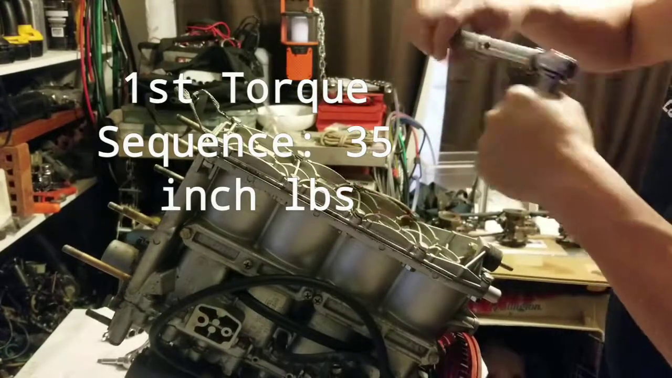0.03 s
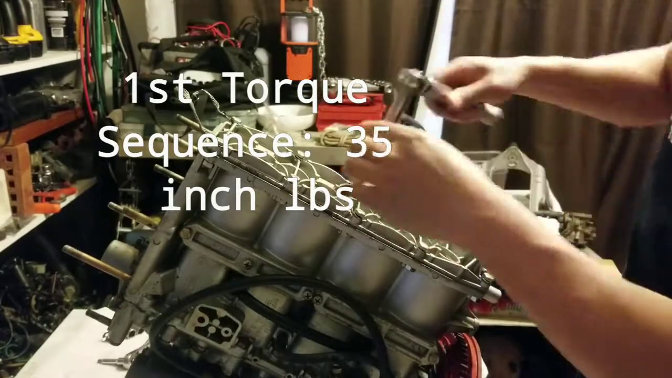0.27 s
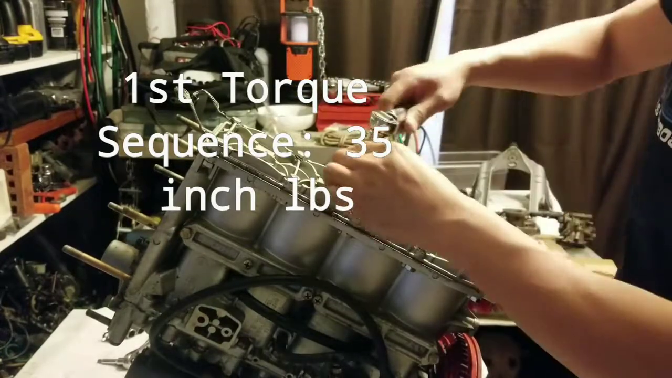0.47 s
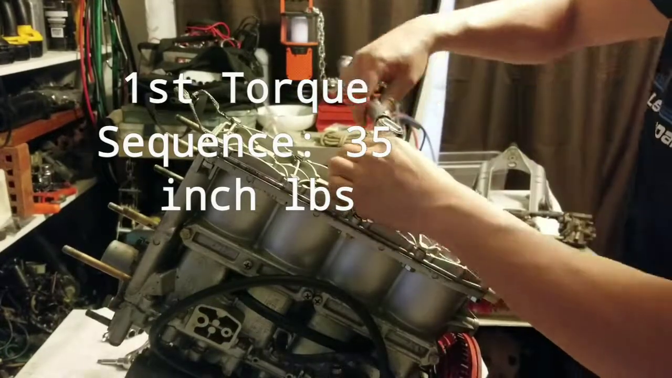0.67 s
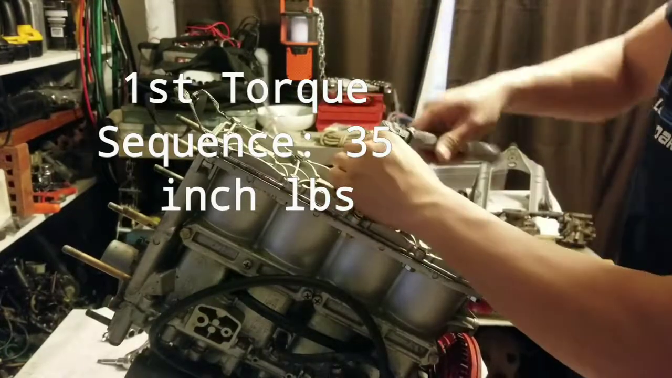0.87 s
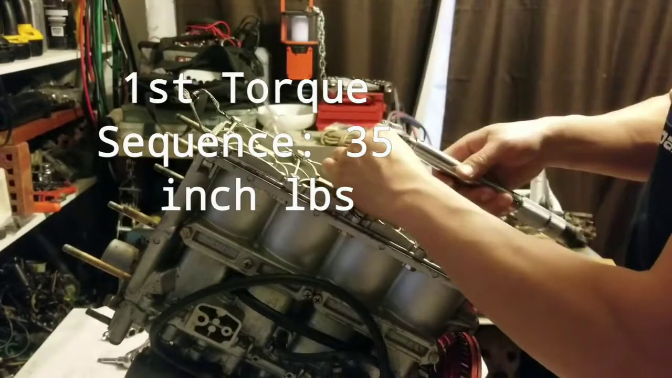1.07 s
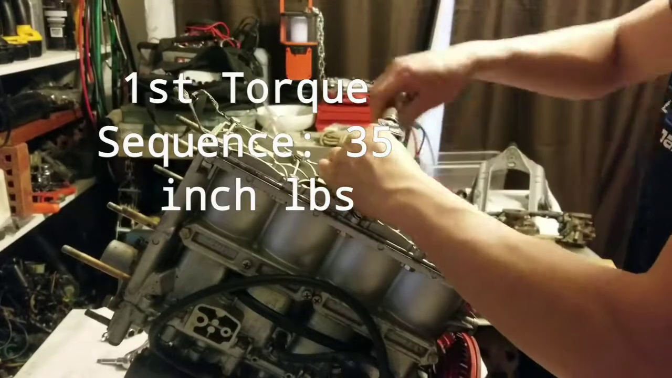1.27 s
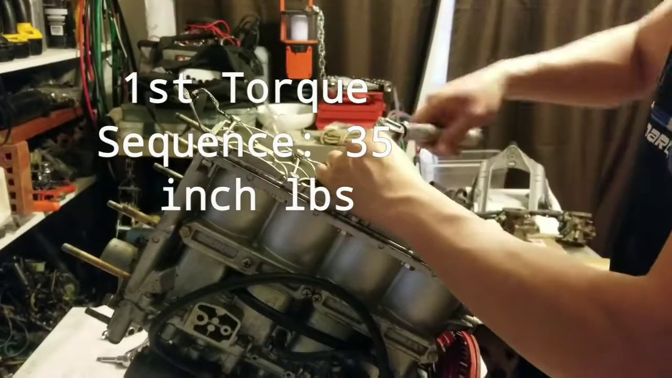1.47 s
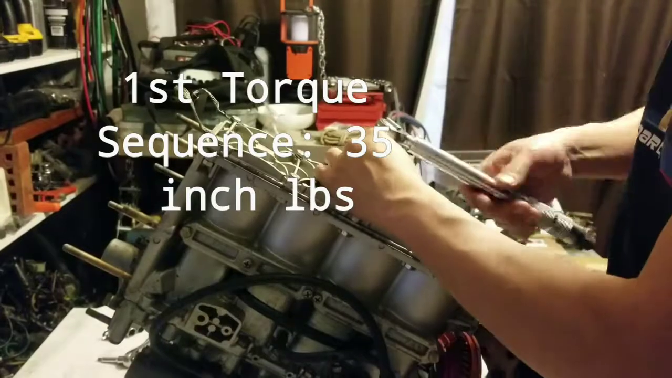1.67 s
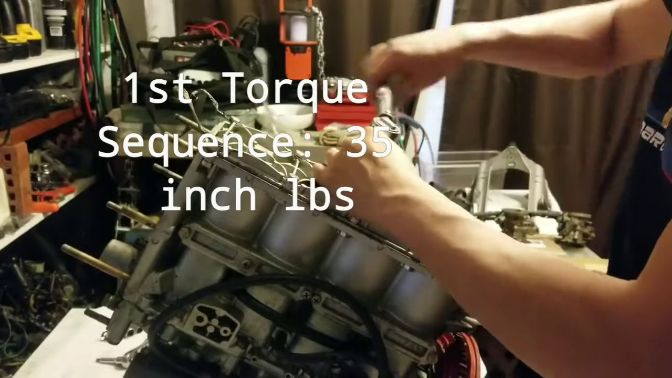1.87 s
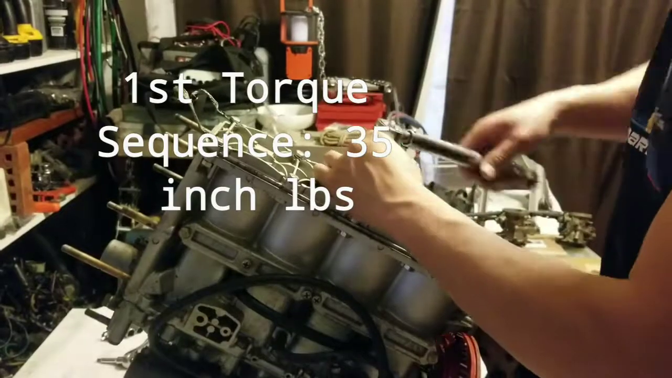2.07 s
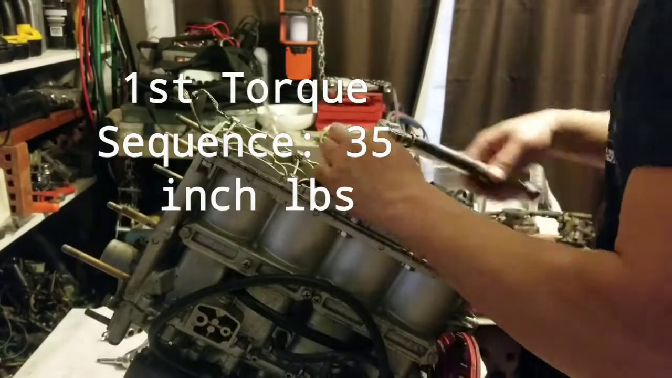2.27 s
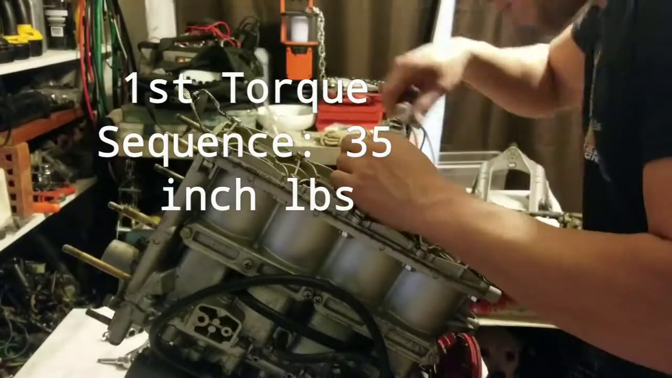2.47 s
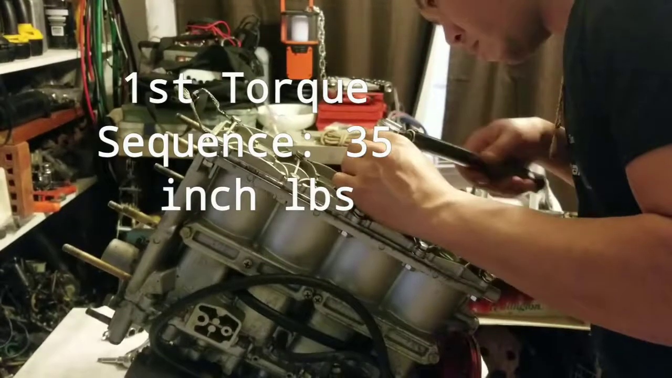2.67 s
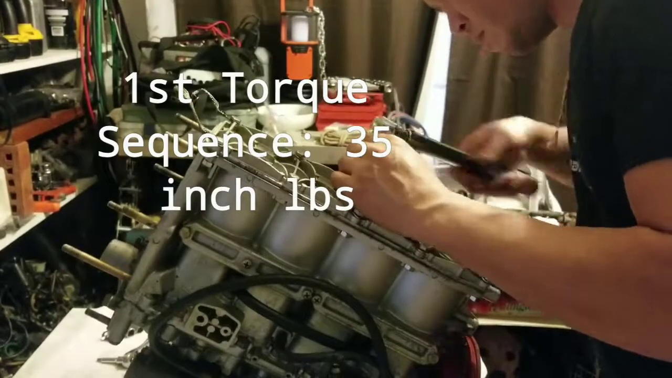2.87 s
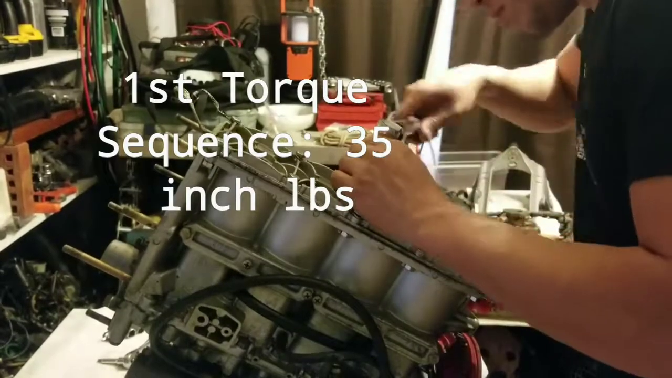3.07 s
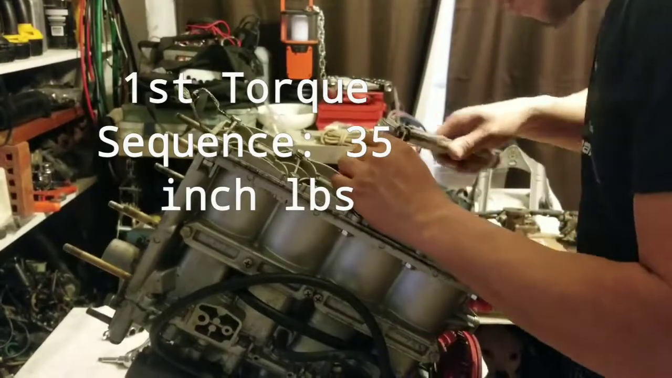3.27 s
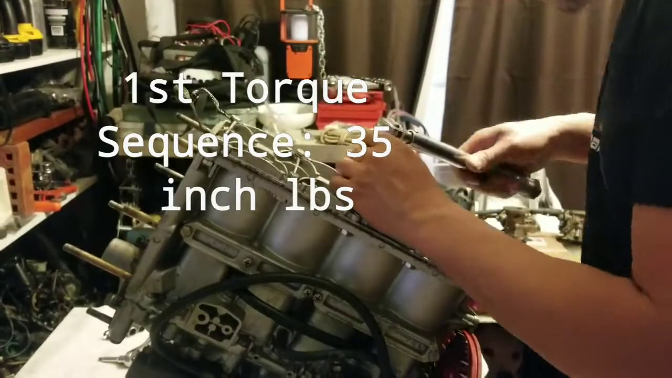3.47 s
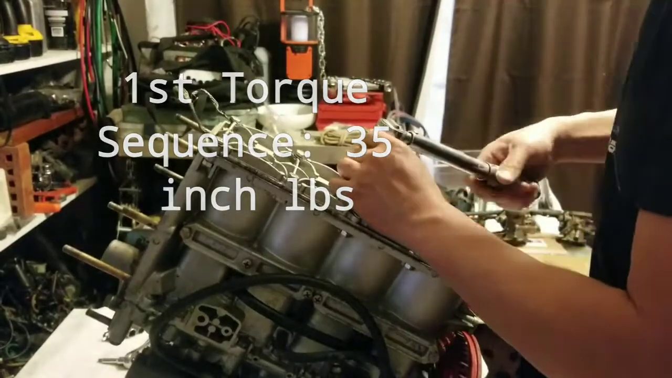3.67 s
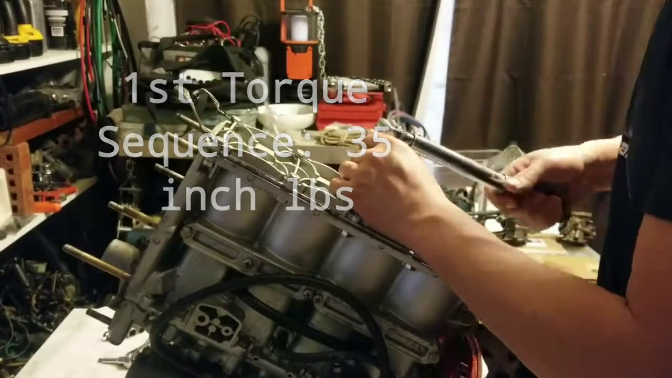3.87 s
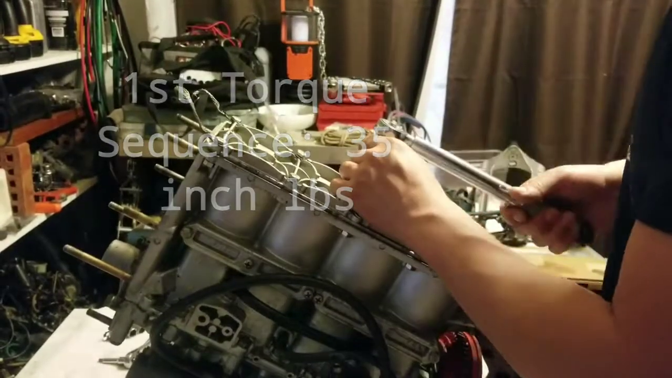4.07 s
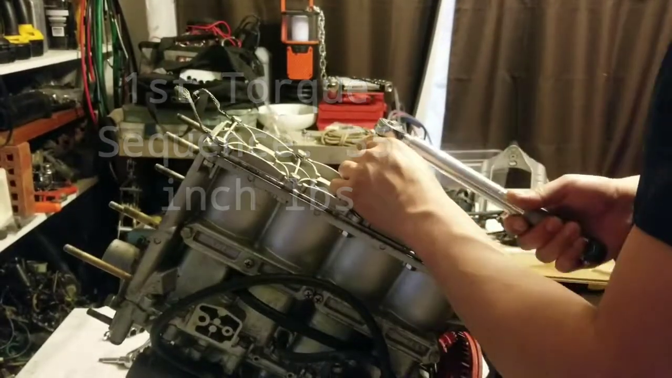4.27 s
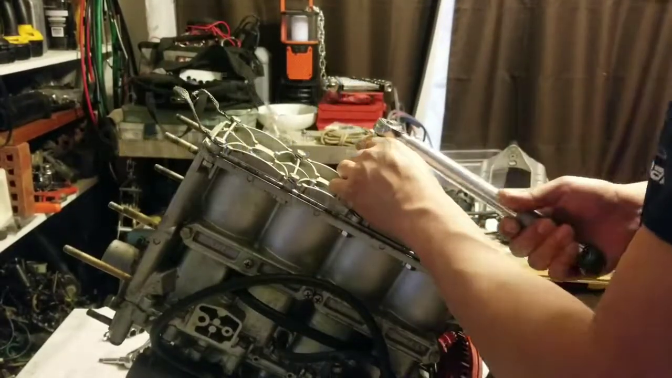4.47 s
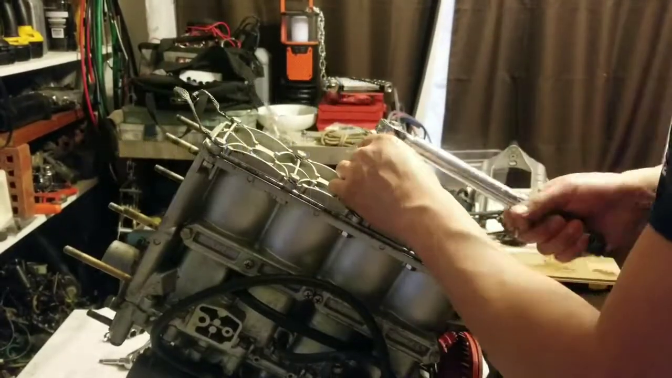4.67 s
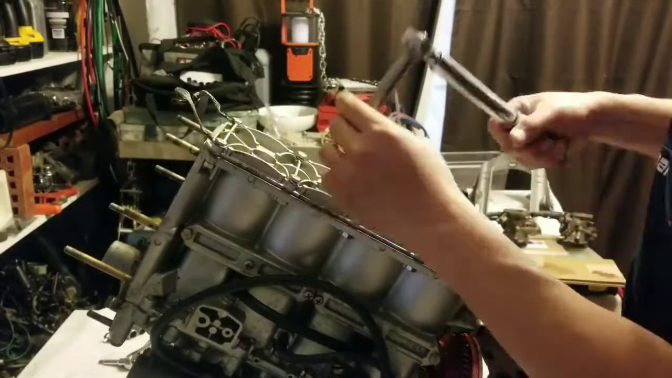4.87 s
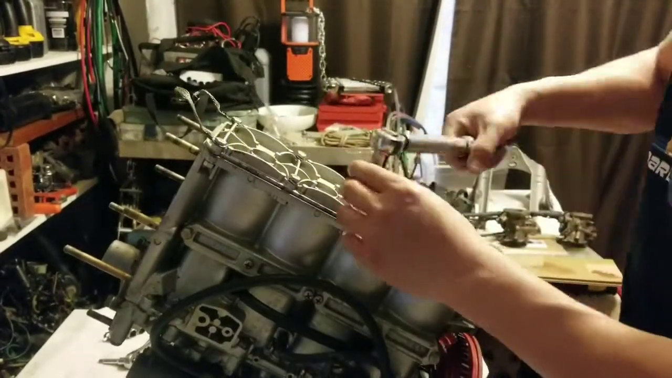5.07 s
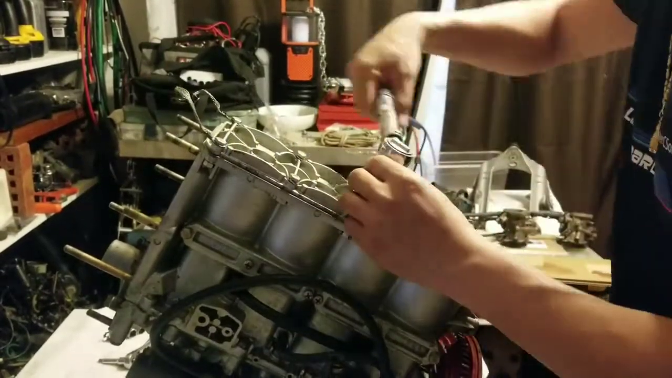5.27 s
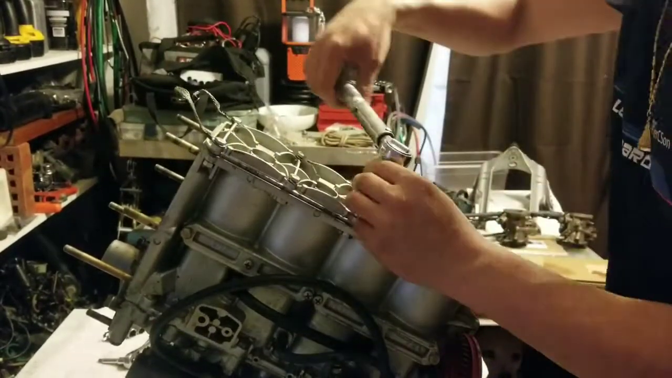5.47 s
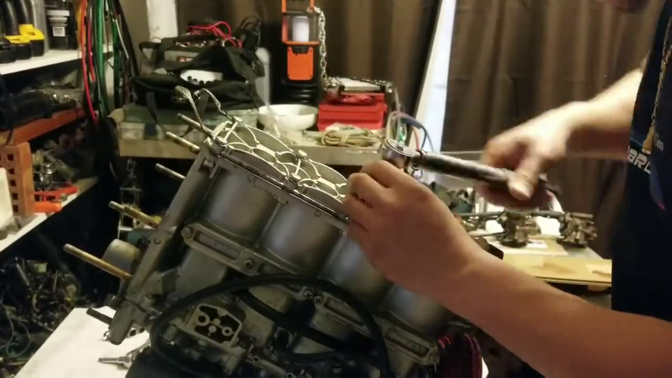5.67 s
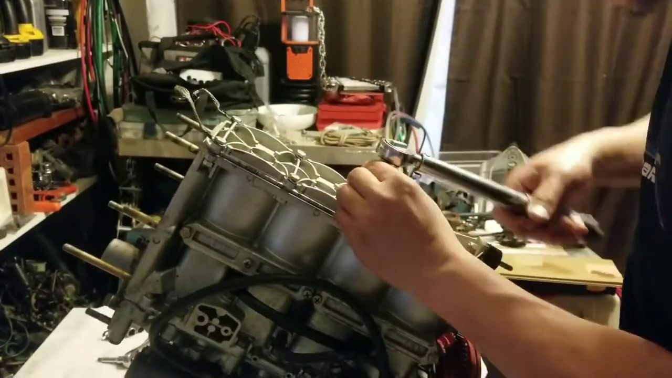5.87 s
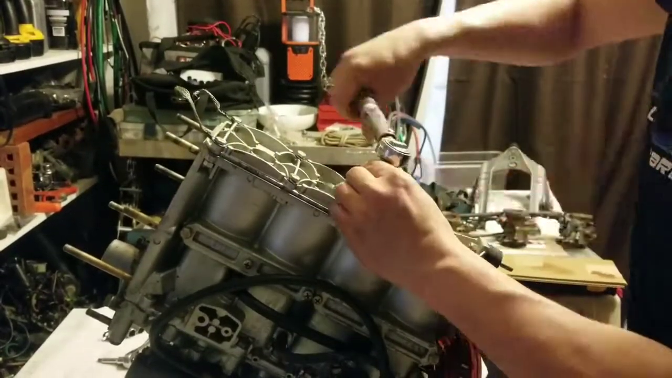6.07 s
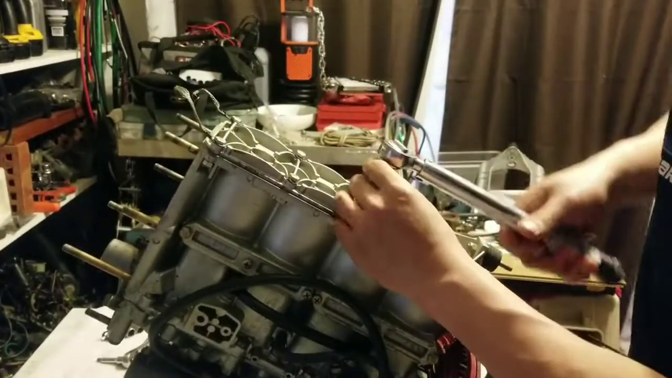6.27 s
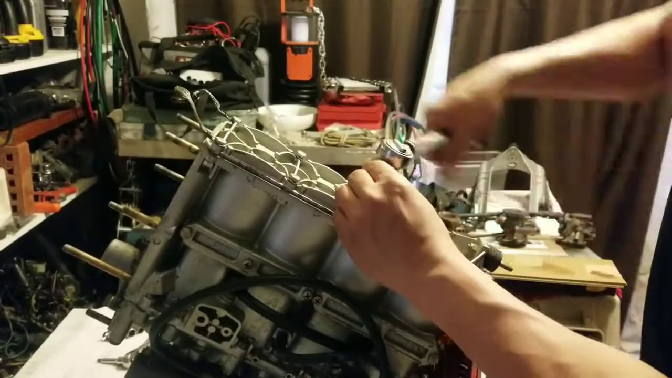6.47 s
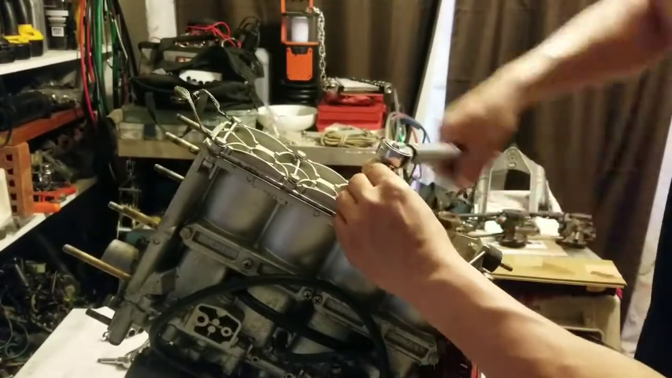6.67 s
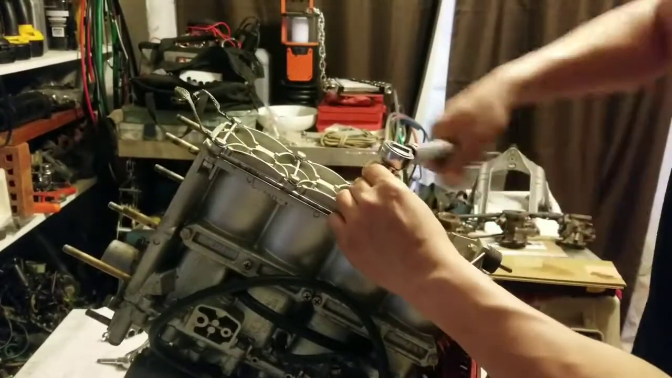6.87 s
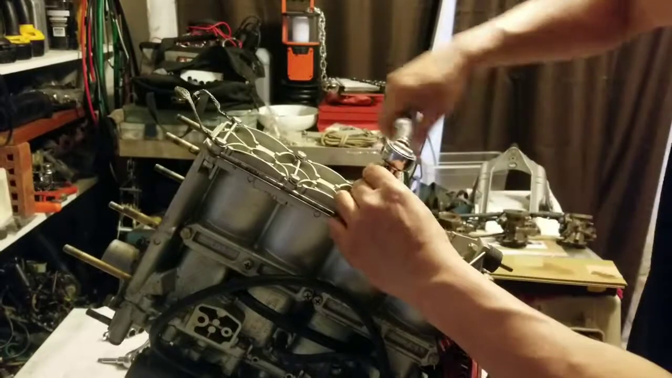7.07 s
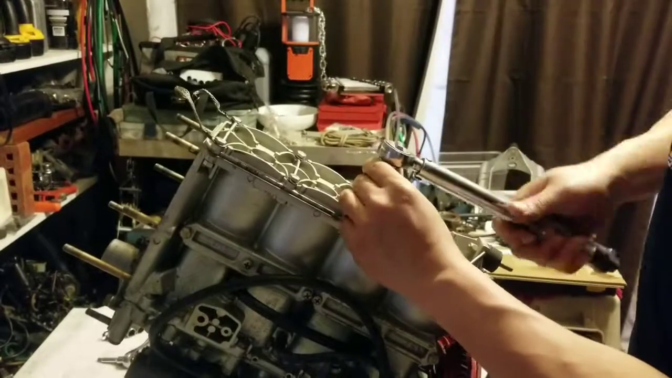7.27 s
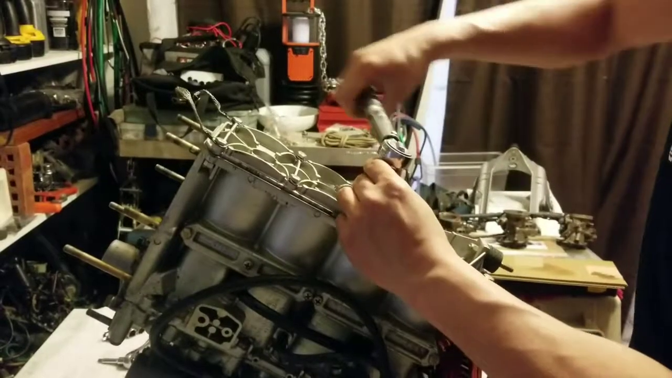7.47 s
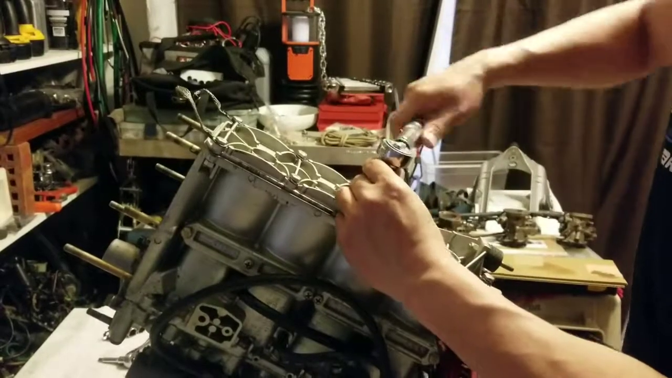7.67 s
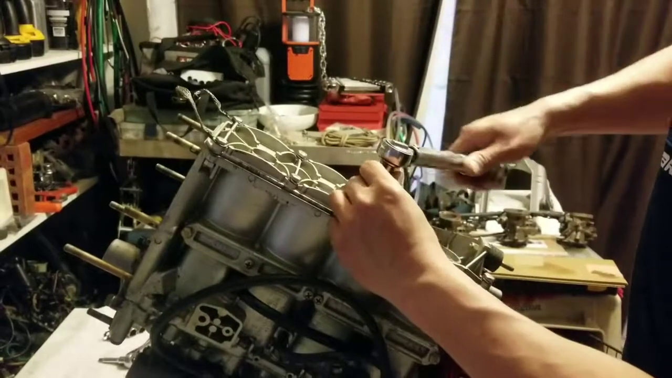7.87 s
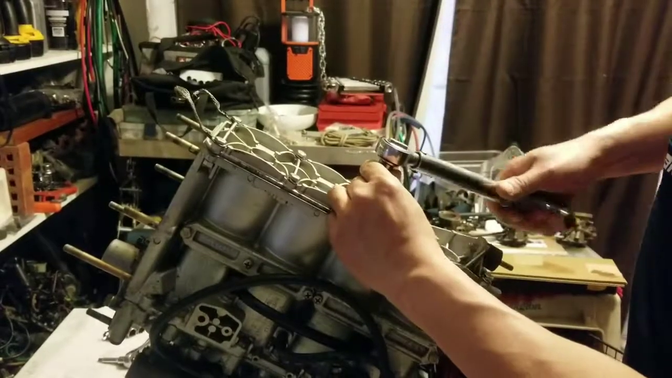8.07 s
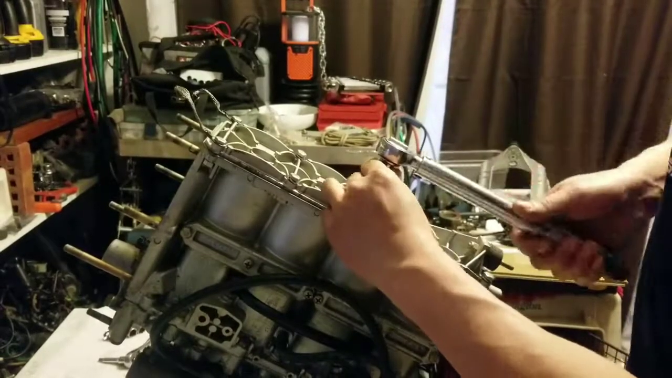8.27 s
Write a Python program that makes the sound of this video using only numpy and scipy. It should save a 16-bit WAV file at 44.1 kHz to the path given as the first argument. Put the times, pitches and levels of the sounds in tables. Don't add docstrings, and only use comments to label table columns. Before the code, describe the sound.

Quick bursts of bright ratchet clicks, separated by quiet pauses, a heavier release thud, and low stand bumps over faint room hiss.

```python
import sys
import numpy as np
from scipy import signal
from scipy.fft import rfft, irfft, next_fast_len
from scipy.io import wavfile
from scipy.ndimage import uniform_filter1d

SR = 44100
rng = np.random.default_rng(int(sys.argv[2]) if len(sys.argv) > 2 else 0)


def generate_wav(signal):
    frames = np.transpose(np.atleast_2d(signal))
    scaled = np.clip(frames, -1, 1) * 32767
    pcm = np.round(scaled).astype(np.int16)
    wavfile.write(sys.argv[1], SR, pcm)


def volts_from_decibels(level):
    exponent = np.asarray(level, float) / 20
    return 10 ** exponent


N = 367353


def evened(x):
    return x / np.sqrt(np.mean(x ** 2) + 1e-20)


def drifting(noise, steps):
    return evened(uniform_filter1d(uniform_filter1d(noise, steps), steps))


def read(points, hz):
    f, value = np.transpose(points)
    return np.interp(np.log(hz + 1), np.log(f + 1), value)


def band_filter(order, edges_hz, kind):
    return signal.butter(order, edges_hz, kind, fs=SR, output="sos")


def ring(modes, chance):
    t = np.arange(2000) / SR
    hz, width, db = np.transpose(modes)[:, :, None]
    detune, phase = chance[:, :len(modes), None]
    hz = hz + width * (detune - 0.5)
    sines = np.sin(2 * np.pi * (hz * t + phase))
    out = (volts_from_decibels(db) * np.exp(-np.pi * width * t) * sines).sum(0)
    return out * np.minimum(t / 0.00015, 1) / np.linalg.norm(out)


def resonate(x, hz, width):
    turn = np.exp(2j * np.pi * np.cumsum(hz * np.ones(x.shape[-1])) / SR)
    r = np.exp(-np.pi * width / SR)
    return 2 * (turn * signal.lfilter([1 - r], [1, -r], x / turn)).real


def resonate_twice(x, hz, width):
    return resonate(resonate(x, hz, width), hz, width)


def add(mix, s, sound, pan_db):
    part = mix[:, round(s * SR):][:, :sound.shape[-1]]
    part += (sound * volts_from_decibels([[pan_db / 2], [-pan_db / 2]]))[:, :part.shape[1]]


def hits(table, bodies, gain_db, burst_s, alike):
    out, u = np.zeros((2, N)), np.arange(400) / SR / burst_s
    for (s, db, *_), body, noise in zip(table, bodies, rng.standard_normal((200, 3, 400))):
        bounces = alike * noise[0] + np.sqrt(1 - alike ** 2) * noise[1:]
        sound = signal.fftconvolve(bounces * u * np.exp(-u), body[None], axes=1)
        peak = np.sqrt(uniform_filter1d(sound ** 2, 40).max(1, keepdims=True))
        add(out, s, volts_from_decibels(db + gain_db) * sound / peak, 0)
    return out


def rattle(modes, per_s, spread_db):
    size = volts_from_decibels(spread_db * np.minimum(rng.exponential(1, N), 4))
    size = size * (rng.random(N) < per_s / SR)
    spot = rng.integers(0, 4, N)
    out = np.zeros((2, N))
    for k in range(4):
        ears = [ring(modes, rng.random((2, 12))) for ear in "LR"]
        out += signal.oaconvolve((size * (spot == k))[None], ears, axes=1)[:, :N]
    return evened(out)


# (frequency [Hz], density [dB per Hz])
AIR = [(120, -43), (200, -11.5), (500, -6.5), (860, -14.5), (1300, -11.5), (3800, -22.5), (14400, -24.5),
       (15500, -46)]
# (frequency [Hz], width [Hz], level [dB])
WHINE = [(1037, 30), (499, 14, -80.5)]
# (time [s], level [dB])
WHINE_SWELL = [(0, -73), (3.0, -81), (3.6, -85), (3.8, -71), (4.0, -83.5), (4.2, -75), (5.2, -77.5),
               (5.4, -82.5), (8.33, -82.5)]


def air():
    hz, t = np.fft.rfftfreq(N, 1 / SR), np.arange(N) / SR
    hiss = evened(irfft(rfft(rng.standard_normal((2, N))) * volts_from_decibels(read(AIR, hz)), N))
    noise = rng.standard_normal((2, N))
    (whine_hz, whine_width), (hum_hz, hum_width, hum_db) = WHINE
    steady = np.sin(2 * np.pi * (whine_hz * t + rng.random((2, 1))))
    wavering = evened(resonate_twice(noise, whine_hz, whine_width))
    swell_db = np.interp(t, *np.transpose(WHINE_SWELL)) + drifting(noise[0], 3000) + 0.5
    whine = evened(steady + 0.45 * wavering) * volts_from_decibels(swell_db)
    hum = volts_from_decibels(hum_db) * evened(resonate(noise, hum_hz, hum_width))
    return volts_from_decibels(-75) * hiss + whine + hum


# (frequency [Hz], 60 dB decay time [s])
ROOM = [(100, 0.076), (800, 0.3), (2000, 0.16), (5500, 0.19), (14000, 0.1)]


def room(x):
    out, turn = np.zeros((2, N)), 2 * np.pi * 7.3 * np.arange(N) / SR
    for k in range(3):
        taps = np.zeros((2, SR // 2))
        at = np.arange(80, SR // 2 - 12, 12) + rng.integers(0, 12, (2, (SR // 2 - 81) // 12))
        np.put_along_axis(taps, at, rng.choice([-1., 1.], at.shape), 1)
        hz, t, z = signal.stft(taps, SR, nperseg=128)
        tail = signal.istft(z * volts_from_decibels(-60 * t / read(ROOM, hz)[:, None]), SR, nperseg=128)[1]
        fed = x.mean(0) * np.sqrt(2 / 3) * np.cos(turn + k * np.pi / 3)
        out += signal.oaconvolve(fed[None], tail / np.linalg.norm(tail[0]), axes=1)[:, :N]
    return out


# (frequency [Hz], left over right [dB])
LEAN = [(1000, 4.5), (2800, 5), (4500, -2), (7000, -4), (10000, 0.5), (14000, -0.5)]


def leaning(x):
    size = next_fast_len(N)
    lean_db = read(LEAN, np.fft.rfftfreq(size, 1 / SR)) / 2
    return irfft(rfft(x, size) * volts_from_decibels([lean_db, -lean_db]), size)[:, :N]


# (time [s], level [dB])
GRIP = [
    (0, -58),
    (3.5, -56),
    (4.55, -59.5),
    (4.9, -52.5),
    (5.05, -71),
    (6.0, -71.5),
    (6.55, -53.5),
    (8.33, -60),
]
# (time [s], level [dB])
SHOVES = [
    (1.451, -45),
    (2.55, -42),
    (3.102, -46.5),
    (4.719, -48),
    (6.201, -45.5),
    (6.697, -42.5),
    (7.101, -42),
    (7.648, -42.5),
]


def shake():
    noise, t = rng.standard_normal((3, N)), np.arange(N) / SR
    lumps = volts_from_decibels(2 * drifting(noise[2], 1500))
    rumble = resonate(resonate(noise[:2], 110, 150), 39, 140)
    rumble = signal.sosfilt(band_filter(3, 25, "high"), rumble)
    rise_db_per_s, fade_db_per_s = 82, 58.5
    shoves = [db - np.maximum(fade_db_per_s * (t - s), rise_db_per_s * (s - t)) for s, db in SHOVES]
    level_db = np.max([np.interp(t, *np.transpose(GRIP)), *shoves], axis=0)
    return volts_from_decibels(level_db - 5 + np.array([[-1.2], [1.2]])) * evened(rumble * lumps)


# (start [s], length [s], from [Hz], to [Hz], level [dB])
SQUEAKS = [
    (0.305, 0.11, 12000, 11300, -75.5),
    (0.412, 0.094, 13000, 11500, -74),
    (0.531, 0.031, 13000, 12000, -83.5),
    (5.709, 0.25, 3890, 3850, -80.5),
]


def squeaks():
    out = np.zeros((2, N))
    for s, length, from_hz, to_hz, db in SQUEAKS:
        n = round(length * SR)
        noise = rng.standard_normal((2, SR // 4))[:, :n]
        tone = evened(resonate(noise, np.linspace(from_hz, to_hz, n), 180))
        add(out, s, volts_from_decibels(db) * tone * np.hanning(n), 0)
    return out


# (time [s], peak [dB], ring [Hz], slow sway [dB])
THUMPS = [(0.616, -47, 184, -2), (0.687, -48, 185, -5), (0.75, -37.5, 199.3, -8.5),
          (0.863, -51, 189.6, -8.5), (1.268, -46, 163, -1), (1.354, -41, 202.5, -28.5),
          (1.578, -41.5, 181, 3), (1.862, -48, 132, -2), (1.999, -39, 181, -7), (2.121, -48.5, 120.6, -0.5),
          (2.657, -48.5, 67.7, 2.5), (3.04, -52, 126, -12), (3.124, -42, 104, -8), (3.165, -46.5, 118, -22),
          (3.252, -38, 49, -19), (3.273, -42, 106.3, -21), (3.726, -58.5, 119.2, -8),
          (4.607, -30.5, 90.3, -12), (4.758, -33, 69.4, -6), (4.805, -41, 143, -3.5),
          (4.858, -49, 149, -1.5), (5.343, -54.5, 111.5, -3), (6.115, -52.5, 113, -15),
          (6.199, -48, 190, -17), (6.666, -44.5, 172.3, -3.5), (7.051, -46.5, 175, -19),
          (7.562, -50, 120, -26), (7.63, -51, 119, -14.5), (7.765, -42, 109.5, -7)]
# (time [s], peak [dB], ring [Hz], slow sway [dB], 60 dB decay time [s], sharpness [dB])
BREAK = [
    (3.3855, -27, 202.4, -1, 0.023, -25),
]


def thumps():
    out, t = np.zeros((2, N)), np.arange(SR // 4) / SR
    stand_t60_s, stand_sharp_db = 0.19, -30
    table = [(*row, stand_t60_s, stand_sharp_db) for row in THUMPS] + BREAK
    dull = band_filter(3, [200, 800], "band")
    knock_shape = np.exp(-t / 0.011) * (1 - np.exp(-(t / 0.0037) ** 2))
    chances, noises = rng.random((len(table), 2, 1)), rng.standard_normal((len(table), 2, len(t)))
    for (s, db, hz, sway_db, t60, sharp_db), chance, noise in zip(table, chances, noises):
        boom = np.sin(2 * np.pi * (hz * t + 0.4 * chance))
        sway_hz = 42 + 30 * chance.mean()
        sway = volts_from_decibels(sway_db) * np.sin(2 * np.pi * (sway_hz * t + chance[::-1]))
        judder = 0.84 * evened(resonate_twice(noise, hz, 70))
        shape = (1 - np.exp(-(t / (0.054 * t60)) ** 2)) * volts_from_decibels(-60 * t / t60)
        knock = evened(signal.sosfilt(dull, noise)) * knock_shape
        add(out, s, volts_from_decibels(db + 6.5) * ((boom + sway + judder) * shape + volts_from_decibels(sharp_db) * knock), -3.5)
    return out


RAP_LOW_HZ, RAP_HIGH_HZ = 447.7, 1920
# (time [s], peak [dB])
RAPS = [
    (0.619, -52),
    (0.749, -57),
    (0.861, -63),
    (3.384, -59),
    (4.602, -52),
    (4.747, -56.5),
    (5.256, -52.5),
    (5.291, -60),
    (5.332, -55),
    (5.455, -64),
]


def raps():
    out, t = np.zeros((2, N)), np.arange(3000) / SR
    hollow = band_filter(5, [RAP_LOW_HZ, RAP_HIGH_HZ], "band")
    shape = np.exp(-t / 0.023) * np.minimum(t / 0.00043, 1)
    for s, db in RAPS:
        knock = evened(signal.sosfilt(hollow, rng.standard_normal((2, len(t)))))
        add(out, s, volts_from_decibels(db) * knock * shape, 2.5)
    return out


# (time [s], socket rattle [dB], most excited ring [Hz], pawl chatter share [dB])
FIRST_SWINGS = [
    [(0.016, -49.5, 3660, -2), (0.082, -37, 3570, 0), (0.164, -47, 3800, 2), (0.175, -61, 3800, 1)],
    [(1.304, -54, 3300, -10), (1.326, -42, 3340, 5.5), (1.434, -46.5, 3720, 6), (1.488, -47.5, 3640, 5.5),
     (1.5, -51, 3730, 1)],
    [(1.91, -49, 3800, -4), (1.918, -49, 3970, -1), (1.958, -43, 4130, 1), (2.012, -45, 3620, 6),
     (2.058, -46.5, 4030, 6), (2.08, -59, 4000, 5)],
    [(2.422, -58, 3140, -4), (2.43, -51.5, 3170, -3), (2.446, -43.5, 3240, -6), (2.486, -44.5, 4270, -3),
     (2.538, -42.5, 3620, -5.5), (2.58, -44.5, 3910, -2.5)],
    [(3.053, -69, 4490, -4), (3.061, -48, 4350, -12), (3.097, -44.5, 3830, 1), (3.165, -47.5, 4630, 5)],
]
SECOND_SWINGS = [
    [(6.041, -51, 3100, -6.5), (6.043, -48, 3050, 2), (6.101, -44.5, 3320, 4.5), (6.187, -43, 3060, 6),
     (6.229, -47, 3560, -6.5), (6.24, -51, 3580, 7)],
    [(6.565, -39, 3970, -6), (6.601, -40.5, 4080, 1), (6.629, -37.5, 3620, 1), (6.667, -38, 3400, -6),
     (6.731, -45, 3800, 0.5), (6.735, -45, 3850, 11)],
    [(7.011, -51, 3920, -2.5), (7.037, -38, 3980, -10), (7.069, -37.5, 3700, -3),
     (7.139, -47.5, 4230, -1.5), (7.179, -42.5, 3060, -16.5), (7.19, -45.5, 3100, 5.5)],
    [(7.524, -54, 3620, -5.5), (7.532, -48.5, 3640, -5), (7.616, -41.5, 3270, 3.5), (7.674, -48, 3640, 3),
     (7.694, -44, 3440, -17), (7.72, -50.5, 3300, -13)],
]
# (start [s], length [s], rattle [dB], most excited ring [Hz], pawl chatter share [dB])
NUDGES = [(.0, 0.014, -53.5, 4180, -46), (0.328, 0.048, -57.5, 5000, -7), (0.608, 0.043, -49.5, 4000, -13),
          (0.736, 0.044, -53, 4400, -16), (0.852, 0.031, -51.5, 3830, 4), (1.248, 0.078, -67, 3380, -22),
          (1.562, 0.046, -58, 4700, -13.5), (1.863, 0.051, -62.5, 3600, -4.5),
          (2.125, 0.013, -61.5, 3440, -9), (2.642, 0.045, -65.5, 3200, -18),
          (3.025, 0.028, -62.5, 4100, -15), (3.227, 0.052, -67.5, 3920, -8),
          (4.607, 0.02, -45.5, 4240, -7.5), (4.739, 0.033, -49, 3330, -10),
          (4.813, 0.046, -62.5, 3600, -25), (4.883, 0.04, -51.5, 3610, -2.5),
          (5.249, 0.033, -42.5, 1920, -19.5), (5.285, 0.015, -40, 1920, -34),
          (5.321, 0.028, -41.5, 2290, -19.5), (5.447, 0.031, -48, 4200, -12),
          (5.482, 0.011, -41, 2070, -10), (5.532, 0.012, -46, 3630, 5), (5.858, 0.024, -68.5, 2400, -13),
          (6.528, 0.036, -67.5, 3780, -15)]


def motions():
    start_db, end_db = -13, -5.5
    nudges = [[(s, db + start_db, hz, share_db),
               (s + length * 0.27, db, hz, share_db),
               (s + length, db + end_db, hz, share_db)] for s, length, db, hz, share_db in NUDGES]
    return sorted(FIRST_SWINGS + SECOND_SWINGS + nudges, key=lambda rows: rows[0][0])


# (frequency [Hz], width [Hz], level [dB])
SOCKET = [(1850, 340, -11), (2133, 340, -3), (2400, 220, -6), (2650, 200, -1), (3000, 250, 3.5),
          (3380, 280, 1), (3620, 99, -6), (4000, 190, -3.5), (4467, 230, 2.5), (4700, 440, 4.5),
          (5030, 420, 5), (5383, 450, 1)]


def socket_rattle(level):
    socket = rattle(SOCKET, 1500, 3.1)
    hz = np.interp(np.arange(N) / SR, *np.concatenate(motions())[:, [0, 2]].T)
    rocking = drifting(rng.standard_normal(N), round(0.015 * SR))
    loose = np.clip((hz - 1800) / 1300, 0.1, 1)
    hz = hz * (1 + 0.15 * rocking * loose)
    socket = resonate_twice(socket, hz, 1300) + 1.064 * loose * socket
    return volts_from_decibels(-0.5) * level * signal.sosfilt(band_filter(6, 5900, "low"), socket)


def casting_murmur(level):
    hollow = band_filter(2, [2 * RAP_LOW_HZ, RAP_HIGH_HZ], "band")
    return evened(signal.sosfilt(hollow, rng.standard_normal((2, N)))) * level


# (frequency [Hz], width [Hz], level [dB])
PAWL_LOW = [(6780, 400, -3.5), (7166, 860, 0.5)]
PAWL_MID = [(9240, 540, -8), (10393, 410, 0), (10690, 830, -2)]
PAWL_HIGH = [(12000, 500, -4.5), (13170, 470, -1.5), (14060, 700, -12.5)]


def pawl_chatter(level, seat):
    rings = zip(seat, (-6, -3, -4), (PAWL_LOW, PAWL_MID, PAWL_HIGH))
    pawl = sum(share * volts_from_decibels(db) * rattle(modes, 2500, 3.8) for share, db, modes in rings)
    return volts_from_decibels(-2.5) * level * pawl


# (pawl's low ring [dB], pawl's high ring [dB], rattle passed into the casting [dB])
PAWL_SEAT = [(1.5, 0.5, -40), (-6, -2, -14.5), (-4, 1, -17), (6, 6.5, -19), (0.5, 1, -28), (-4, -2, -20.5),
             (-3, -5.5, -32), (4.5, 2.5, -27.5), (-3, -0.5, -23)]


def moves():
    t = np.arange(N) / SR
    level, seat, passed = np.zeros((2, N)), np.ones((3, N)), np.zeros(N)
    for rows in motions():
        s, db, _, share_db = np.transpose(rows)
        span = slice(round(s[0] * SR), round(s[-1] * SR))
        level[:, span] = volts_from_decibels([np.interp(t[span], s, v) for v in (db, db + share_db)])
    drops = np.transpose(FIRST_TEETH + SECOND_TEETH)[0]
    for rows, (low_db, high_db, casting_db) in zip(FIRST_SWINGS + SECOND_SWINGS, PAWL_SEAT):
        start, end = round(rows[0][0] * SR), round(rows[-1][0] * SR)
        first_tooth_s = drops[drops > rows[0][0]][0]
        level[1, start:round(first_tooth_s * SR)] = 0
        seat[:, start:end] = volts_from_decibels([[low_db], [0], [high_db]])
        passed[start:end] = volts_from_decibels(casting_db)
    socket_level, pawl_level = uniform_filter1d(level, 60, origin=29)
    rattling = socket_rattle(socket_level)
    casting = casting_murmur(socket_level * passed)
    return rattling + pawl_chatter(pawl_level, seat), casting


# (time [s], peak [dB], most excited ring [Hz])
CLACKS = [(0.0197, -37, 3620.0), (0.0763, -28, 3200), (0.1214, -34.5, 3900), (0.1306, -41, 4060),
          (0.1538, -39.5, 2940), (0.7465, -34, 4470), (0.7531, -35.5, 4370.0), (1.311, -43, 3555),
          (1.3276, -40, 3030), (1.3483, -39, 3400), (1.3844, -37, 3660), (1.3979, -45, 4270),
          (1.4537, -34, 4940), (1.4795, -39, 3300), (1.9474, -30.5, 5200), (1.9653, -41, 4730),
          (2.0182, -39, 4500.0), (2.0361, -49, 3500), (2.0525, -40, 5000), (2.4489, -40, 3030),
          (2.5077, -24, 3680), (2.5707, -37, 3660.0), (3.0629, -37, 4630.0), (3.0847, -40, 3350),
          (3.1007, -32, 3530), (3.1544, -40, 4930.0), (4.6027, -36, 4700), (4.6108, -41.5, 4540.0),
          (4.7477, -42, 3450.0), (5.2562, -44, 2900), (5.2731, -32, 1870.0), (5.289, -38, 1940),
          (5.4564, -43, 1950), (5.4854, -36, 3300), (5.534, -39, 3490.0), (6.0842, -47, 3530.0),
          (6.1425, -38, 3420), (6.1544, -35, 3000), (6.1736, -34.5, 2640), (6.1959, -37.5, 3360),
          (6.2245, -34.5, 3450), (6.5662, -37, 3630), (6.5944, -37, 5040), (6.6511, -36, 3620.0),
          (6.7063, -33.5, 3660), (6.7218, -30.5, 3470.0), (7.0226, -42.5, 3650), (7.0394, -35, 4520.0),
          (7.046, -33, 4370), (7.0722, -25.5, 3420.0), (7.103, -37.5, 4570), (7.1206, -31, 4020),
          (7.1478, -41, 3500), (7.1722, -35.5, 3020), (7.5333, -50.5, 3380.0), (7.5771, -42.5, 4000),
          (7.6283, -36.5, 3600.0), (7.6503, -45, 2910.0), (7.6646, -45, 3380.0), (7.6893, -37, 3000),
          (.34, -46.5, 4760), (0.6198, -44.5, 1800), (.6233, -46.5, 2120), (0.627, -41, 3960),
          (.633, -57, 4300), (3.745, -67.5, 4860), (0.76, -40, 5400), (.858, -49.5, 3900),
          (5.262, -37.5, 1900), (5.268, -51, 2520), (5.295, -41, 2240), (5.302, -50, 1850),
          (5.325, -53, 2320), (5.331, -36, 1850), (5.335, -49, 1820), (5.341, -56, 2400),
          (5.344, -42, 1850), (5.452, -45, 4200), (5.481, -41, 1920), (5.49, -38.5, 1950),
          (5.492, -39, 4900), (5.529, -52, 4000)]
# (time [s], peak [dB])
SNAPS = [
    (1.9478, -37),
    (4.6028, -27),
    (5.2562, -41),
    (6.5659, -37),
    (7.0396, -27),
]
# (frequency [Hz], width [Hz], level [dB])
SNAP = [(2900, 1900, -15), (4550, 5000, 0.5)]


def clacks():
    table, bodies = CLACKS, []
    for (_, _, hz), chance in zip(table, rng.random((200, 2, 12))):
        body = ring(SOCKET, chance)
        favoured = resonate(resonate(body, hz, 0.21 * hz), hz, 0.11 * hz)
        bodies.append(evened(favoured) + 0.074 * hz / 1000 * evened(body))
    clicks = [resonate_twice(ring(SNAP, rng.random((2, 12))), 4600, 2200) for _ in SNAPS]
    snaps = hits(SNAPS, clicks, -0.1, 0.00015, 0.9)
    return hits(table, bodies, -3.1, 0.00045, 0.7) + snaps


# (time [s], peak [dB], low over middle ring [dB], high over middle ring [dB])
FIRST_TEETH = [(0.0256, -28.5, 2, 4.5), (0.035, -35, 7, 3.5), (0.047, -27, 4.5, 10.5),
               (0.0552, -32, 7.5, -2), (0.077, -33, 1.5, -5), (0.0879, -18, -9.5, 6.5),
               (0.097, -24, -3.5, -6.5), (0.1042, -29, 1.5, 7), (0.1209, -30, 6, 2.5),
               (0.147, -33, 16.5, 7.5), (0.1658, -38.5, 4, 15.5), (0.759, -44.5, 25, -11),
               (1.3148, -35.5, -9.5, 2), (1.339, -33, -21, -4.5), (1.3575, -36, -18.5, -12),
               (1.369, -26.5, -25.5, -13.5), (1.3894, -32, -16.5, -14.5), (1.4029, -26.5, -25, -14.5),
               (1.422, -38, 3, -17), (1.461, -34.5, 15, -10), (1.4871, -37, 8.5, 2),
               (1.9209, -34.5, 5.5, 7.5), (1.959, -32.5, 18, 17), (1.994, -31.5, -10, -7),
               (2.012, -28, -19, 3), (2.028, -31.5, -21, -24), (2.0564, -34, -11, 1), (2.4384, -37, 7.5, 5),
               (2.551, -41, 2, -5), (2.4677, -30.5, 3, 5), (2.4854, -38, 3, -3), (2.5094, -33, -11, -4),
               (2.5212, -31, 5.5, 3.0), (2.5713, -34, 2, 3.5), (3.0722, -34.5, 18, 10),
               (3.0851, -26.5, 3, 3.5), (3.115, -31, -14, -7), (3.128, -29, -2, -10), (3.1382, -39, 0, -13),
               (4.899, -51, 2, -3)]
SECOND_TEETH = [(5.465, -47.5, 5, 12), (5.4951, -38, 4, 9), (5.5357, -35.5, 2, 14), (5.542, -46, -5, 6.0),
                (6.0453, -52, -13.5, -2.5), (6.0726, -39.5, -12, 4), (6.0893, -30, -19, -8),
                (6.104, -34, -12.5, -5.5), (6.1166, -28, -19, -11), (6.1335, -31.5, -20.5, -14.5),
                (6.1677, -25, -15, -14), (6.1734, -42, -11.0, -10.0), (6.184, -32, -2, -9),
                (6.2254, -32.5, -1.5, -2.5), (6.568, -42.5, -2, -5.5), (6.589, -24, -8.5, -14.5),
                (6.6063, -32, -8, -11), (6.6257, -25, -18.5, 0.5), (6.6376, -26, -16, -2.5),
                (6.6507, -22.5, -16, 5.5), (6.664, -26, -8, -12), (6.6755, -30, -7.5, 8),
                (6.6847, -30, -9, 0.5), (6.6964, -35.5, 0, 1.5), (6.732, -37.5, 7, 8.5),
                (7.023, -32.5, 3, -3), (7.04, -32, 8, 6.5), (7.069, -38, 1.5, 4.5), (7.1033, -27, -0.5, 6),
                (7.1186, -26, -6, -6), (7.137, -30, -10.5, 0.5), (7.1497, -24.5, -7.5, -13.5),
                (7.1835, -37.5, -9, -4), (7.535, -36, 2.5, 6.5), (7.5565, -38, -5, 14),
                (7.5645, -29, 7.5, 17.5), (7.581, -29.5, 2.5, 12), (7.6061, -23, -16, -7.5),
                (7.6113, -29.5, -12, 3.5), (7.6236, -27.5, -21, -7), (7.6487, -30, -11.5, -10),
                (7.665, -33, -6.0, -8), (7.673, -34.5, -1.5, -5), (7.695, -22, -13.5, -8)]


def ticks():
    s, db, low_db, high_db = np.transpose(FIRST_TEETH + SECOND_TEETH)
    mid_db = db - 10 * np.log10(1 + volts_from_decibels(2 * low_db) + volts_from_decibels(2 * high_db))
    out, chances = np.zeros((2, N)), rng.random((200, 3, 2, 12))
    groups = ((mid_db + low_db, PAWL_LOW), (mid_db, PAWL_MID), (mid_db + high_db, PAWL_HIGH))
    for k, (part_db, modes) in enumerate(groups):
        bodies = [ring(modes, chance) for chance in chances[:len(s), k]]
        out += hits(zip(s, part_db), bodies, -1.6, 0.00054, 0.72)
    return out


def scene():
    teeth, knocks, (rattling, casting) = ticks(), clacks(), moves()
    thin = band_filter(2, 1400, "high")
    teeth, loose_steel = signal.sosfilt(thin, [teeth, knocks + rattling])
    blows = thumps()
    wet = room(volts_from_decibels(-4) * teeth + volts_from_decibels(-2.5) * loose_steel + volts_from_decibels(-15.5) * blows)
    near = leaning(teeth + loose_steel + wet)
    return near + blows + shake() + air() + squeaks() + raps() + casting


# (from [s], to [s], band from [Hz])
LOW_GAPS = [(.03, .13, 300), (2.045, 2.085, 680), (2.465, 2.505, 550), (2.53, 2.585, 580),
            (3.14, 3.175, 750), (6.115, 6.195, 520), (6.68, 6.74, 550), (7.052, 7.118, 550),
            (7.162, 7.197, 580)]
# (from [s], to [s], band from [Hz])
HIGH_GAPS = [(.605, .685, 10200), (1.905, 1.919, 8500), (4.616, 4.675, 11500), (4.735, 4.795, 11300),
             (5.24, 5.365, 10800), (6.553, 6.564, 5600), (7.004, 7.021, 6200), (7.515, 7.533, 6200)]


def with_gaps(dry):
    out, pad = dry.copy(), 600
    gaps = [(*row, 960) for row in LOW_GAPS] + [(*row, 17000) for row in HIGH_GAPS]
    for start, end, low_hz, high_hz in gaps:
        margin = round(2e5 / low_hz)
        a, b = round(start * SR) - margin, round(end * SR) + margin
        band = signal.sosfiltfilt(band_filter(5, [low_hz, high_hz], "band"), dry[:, a - pad:b + pad])
        out[:, a:b] -= band[:, pad:-pad] * signal.windows.tukey(b - a, 0.25)
    return out


def band_limit(x):
    return signal.sosfilt(signal.butter(12, 15800, fs=SR, output="sos"), x)


def record(dry):
    edge = signal.firwin(181, 14750, window=("kaiser", 3.5), fs=SR)
    mix = signal.oaconvolve(with_gaps(dry), edge[None], "same")
    return band_limit(mix)


dry = scene()
out = record(dry)
generate_wav(out)
```